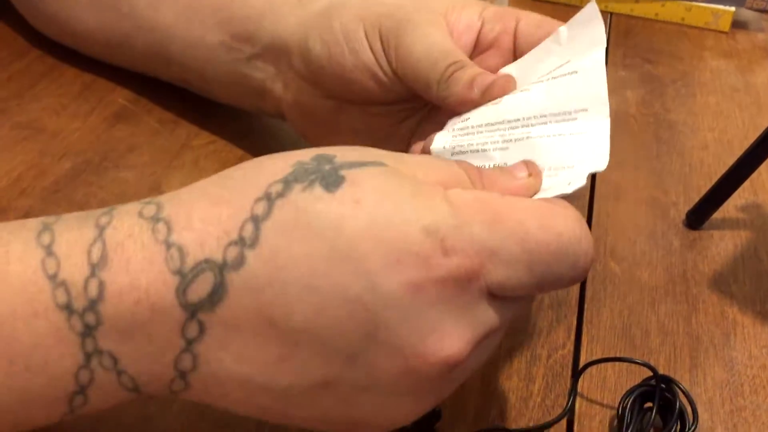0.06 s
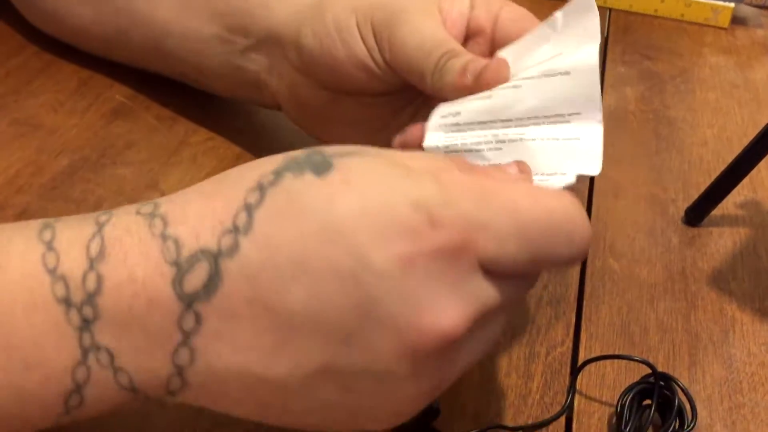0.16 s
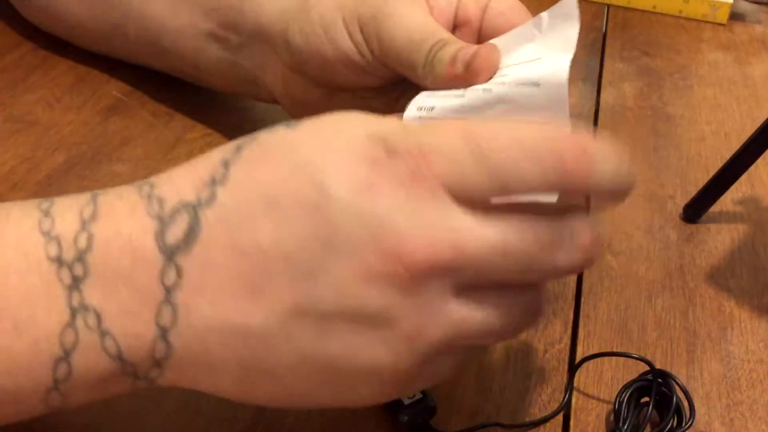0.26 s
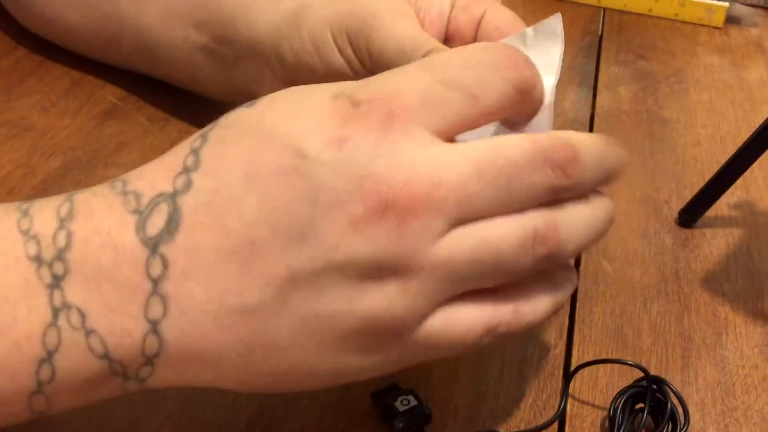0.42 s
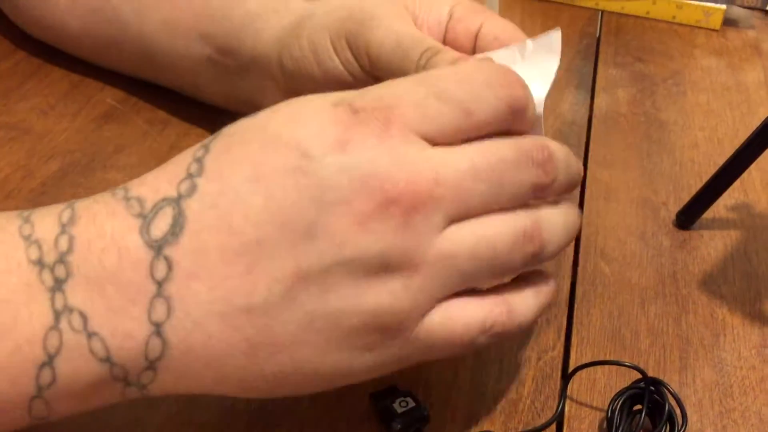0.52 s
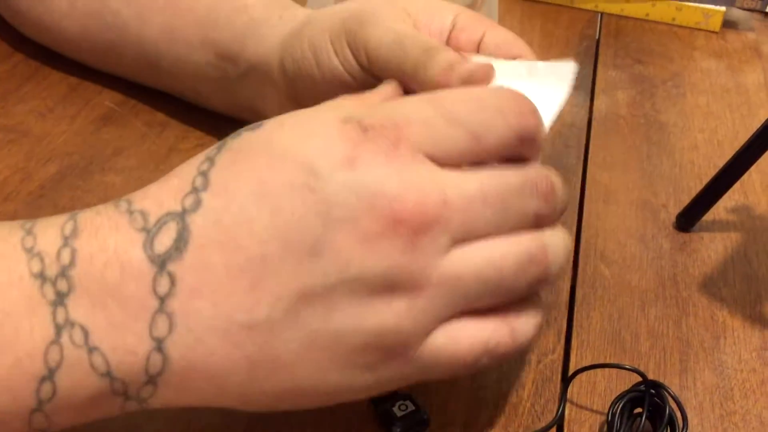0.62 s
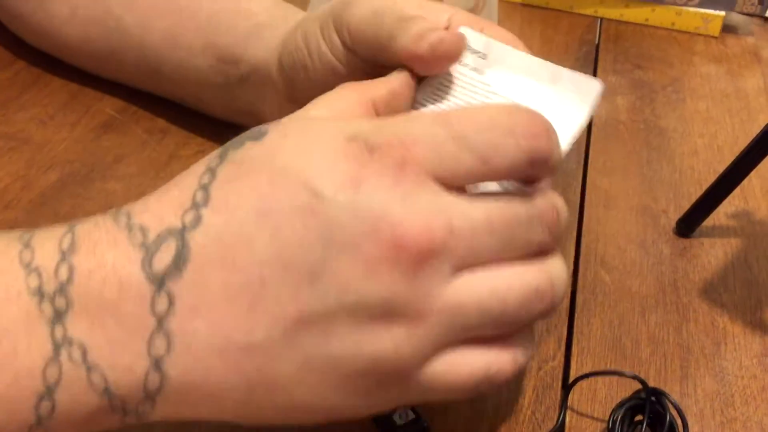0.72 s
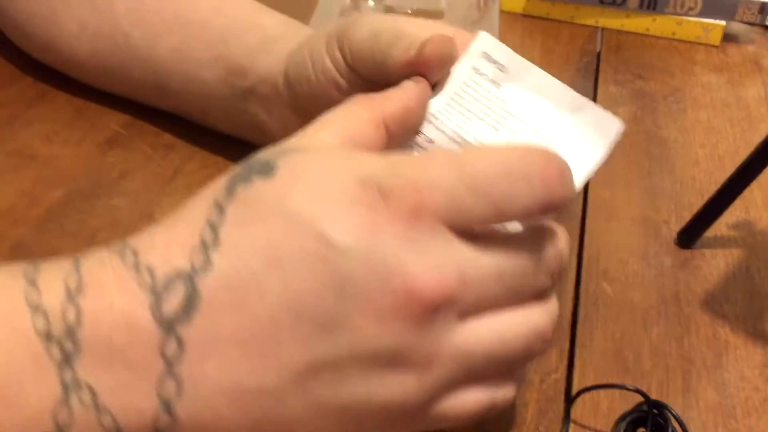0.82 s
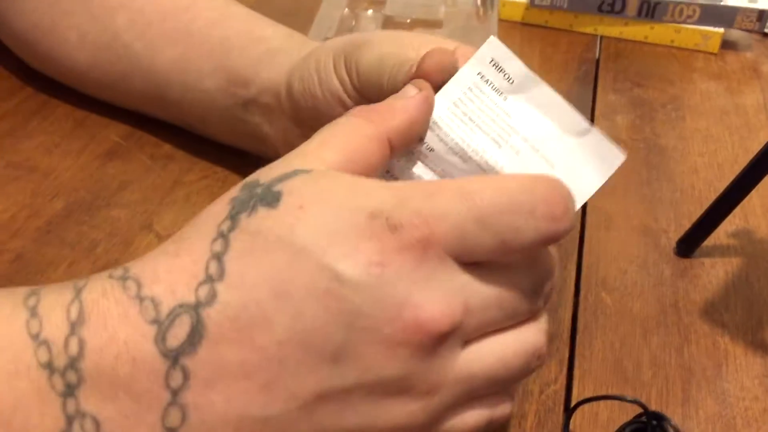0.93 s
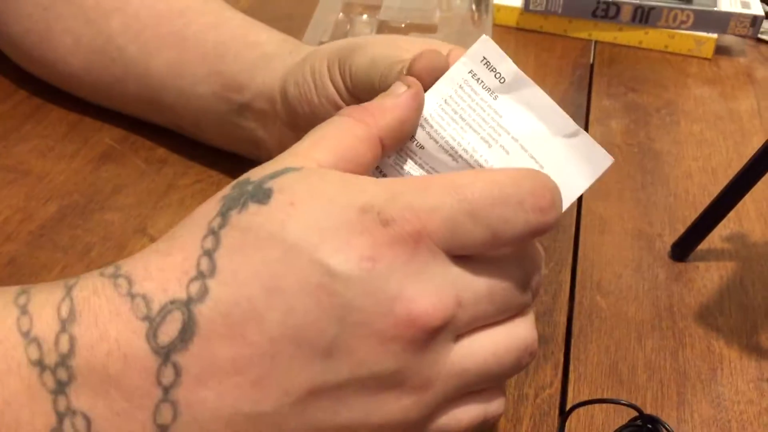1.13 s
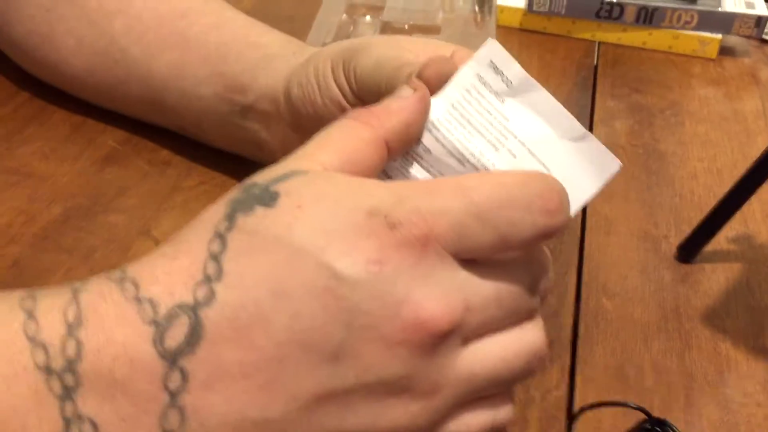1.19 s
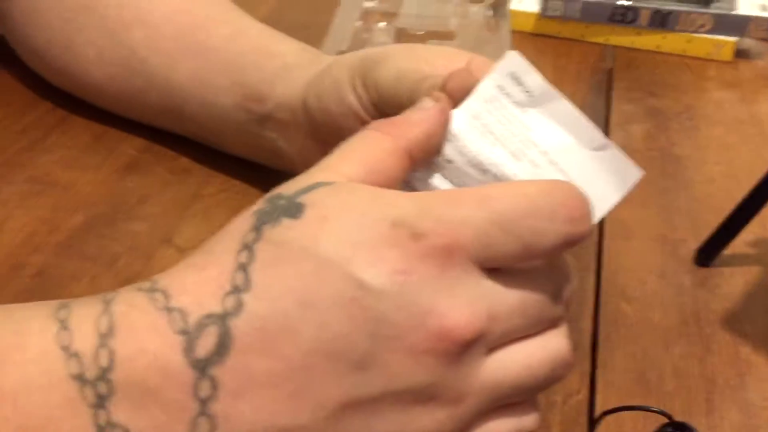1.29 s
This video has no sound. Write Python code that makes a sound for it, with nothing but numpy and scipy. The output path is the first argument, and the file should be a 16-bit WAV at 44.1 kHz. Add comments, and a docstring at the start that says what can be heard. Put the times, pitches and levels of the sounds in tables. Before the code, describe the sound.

Paper crinkling in sharp, irregular snaps with soft finger rustle, then a light knock on wood

```python
"""Creases of a small folded sheet of stiff paper snap over in short cracks as hands open it.
Each crack is a noise burst of milliseconds, coloured by its crease and by the sheet's rings.
Small patches crinkle as decaying tones; fingers slide on the sheet as a dense rain of tiny clicks.
A hand bumps the wooden table, whose modes ring; a quiet furnished room answers and rumbles faintly."""
import sys
import numpy as np
from scipy import signal
from scipy.fft import rfft, irfft
from scipy.io import wavfile
from scipy.ndimage import uniform_filter1d

SR = 44100
rng = np.random.default_rng(int(sys.argv[2]) if len(sys.argv) > 2 else 0)


def master_out(mix):
    """Clip the mix to full scale and print it as 16-bit PCM to the path in sys.argv[1]."""
    frames = np.transpose(np.atleast_2d(mix))
    ceiling = np.clip(frames, -1, 1)
    pcm = np.round(ceiling * 32767).astype(np.int16)
    wavfile.write(sys.argv[1], SR, pcm)


N = 59535


def amp(db):
    """Decibels to amplitude factor."""
    return 10 ** (np.asarray(db) / 20)


def rms_one(x):
    """Scales to rms 1."""
    return x / np.sqrt(np.mean(x ** 2) + 1e-20)


def at_hz(points, hz):
    """Reads a (frequency, value) table on a log frequency axis."""
    points = np.array(points)
    return np.interp(np.log(hz), np.log(points[:, 0]), points[:, 1])


def bump_at(hz, centre_hz, width_hz):
    """Bell of height 1 along frequency."""
    return np.exp(-2 * ((hz - centre_hz) / width_hz) ** 2)


# resonances of the held sheet, and dull regions of the near sounds such as one near 5 kHz: (frequency [Hz],
# width [Hz], gain [dB])
SHEET_MODES = [(647, 150, 0.5), (925, 320, 1.5), (1730, 160, 4), (2300, 300, 1.5), (3200, 350, 0.5),
               (4110, 440, -1), (4960, 430, -4.5), (5800, 1200, 0.5), (7100, 230, 2.5), (8900, 1000, 4),
               (10900, 900, 0)]


def sheet_db(hz):
    """Near sounds favour the held sheet's resonances and are dulled in a few regions."""
    return sum(db * bump_at(hz, mode_hz, width_hz) for mode_hz, width_hz, db in SHEET_MODES)


# crease snaps: (time [s], level [dB], six band levels at SNAP_BAND_HZ [dB per octave], rise [ms],
# decay [ms], main ring [Hz], its lift [dB], second ring [Hz], its lift [dB])
CREASE_SNAPS = [(0.0912, -51, -40, -9, -50, -7.5, -9, -3, 0.7, 2.7, 1000, 3.4, 3300, 3.6),
                (0.1131, -43, -49, -14, -25, -17, -14.5, -10.5, 0.4, 2.4, 1170, 5, 1500, 4.4),
                (0.157, -54.5, -10, 1, -28, 1, -13, 6.5, 0.43, 1.3, 1020, 4, 3900, 3),
                (0.2290, -22, -23.5, -2.5, -4.5, -3, 1.5, -5, 0.81, 0.8, 1050, 2.5, 4100, 5.5),
                (0.2798, -38, -39, -3.5, -5.5, -10, -9, 0.5, 0.84, 2.3, 4300, 6.2, 1860, 0.1),
                (0.2911, -31, -16.5, -8.5, -5, -5.5, 0.5, -7, 0.53, 2.15, 4200, 5.7, 614, 4.7),
                (0.414, -44.5, -11.5, -11.5, -6.5, -2, -6, -3.5, 1.5, 3.1, 3170, 3.6, 1380, 5.7),
                (0.4589, -43, -16, -11, -9, -5, -6, -6.5, 0.79, 2.2, 1240, 10.2, 4300, 1.5),
                (0.509, -49.5, -5, 0, -13, 0, -4, -7.5, 0.54, 2.1, 2290, 4.4, 700, 2),
                (0.5172, -24.5, -15.5, -7, -10, -1, -11, -14.5, 0.36, 1.5, 678, 8, 3670, 1.74),
                (0.549, -25.5, -26.5, -15, -18.5, -27, -13.5, -27, .4, 2, 1090, 3, 3696, 8.2),
                (0.5554, -49.5, -4, -0.5, -3.5, 10.5, 6, 1.5, 0.36, 1.4, 1700, 5.2, 900, 1.7),
                (0.5983, -44, -7.5, 3, -1.5, -3, 2.5, -15.5, 0.31, 1.5, 944, 9.5, 2540, 4.8),
                (0.689, -50, -10, -13, -7, -4, -11, -8, 1.1, 3.2, 1600, 6.4, 895, 3.4),
                (0.6958, -32.5, -20.5, -17, -4, -10.5, -4.5, 2, 2, 0.88, 1600, 4.5, 600, 6.5),
                (0.7838, -34.5, -31, -6.5, -3.5, -5, -8.5, -19, 0.59, 1.58, 1490, 4.6, 4300, 1)]
# bands of the crease colour: (frequency [Hz])
SNAP_BAND_HZ = [650, 1000, 1870, 3350, 6000, 11300]
SNAP_BASS_DB_PER_OCT = 14  # fall below the lowest band
SNAP_TOP_DB = -8.5  # change from the highest band to 16 kHz
RING_WIDTH_SHARE = 0.18  # of the ring frequency


def snap_colour_db(hz, band_db, ring_hz, ring_db, second_hz, second_db):
    """Target spectrum of one snap: crease bands, sheet modes and two rings of its own."""
    points = [*zip(SNAP_BAND_HZ, band_db), (16000, band_db[-1] + SNAP_TOP_DB)]
    colour_db = at_hz(points, hz) - 10 * np.log10(hz / 1000)  # per octave to per Hz
    colour_db = colour_db + sheet_db(hz)
    colour_db += ring_db * bump_at(hz, ring_hz, RING_WIDTH_SHARE * ring_hz)
    colour_db += second_db * bump_at(hz, second_hz, RING_WIDTH_SHARE * second_hz)
    return colour_db - SNAP_BASS_DB_PER_OCT * np.maximum(np.log2(SNAP_BAND_HZ[0] / hz), 0)


def causal_response(gain_db, size):
    """Minimum-phase response with the given gain, by folding the cepstrum."""
    cepstrum = irfft(gain_db * np.log(10) / 20)
    cepstrum[1:size // 2] *= 2
    cepstrum[size // 2 + 1:] = 0
    return np.exp(rfft(cepstrum))


def snaps():
    """Each crease gives way in a burst of milliseconds, coloured by crease and sheet."""
    size = 2048
    out = np.zeros(N + size)
    ms = np.arange(size) / SR * 1000
    hz = np.maximum(np.fft.rfftfreq(size, 1 / SR), 20)
    for start_s, level_db, *band_db, rise_ms, decay_ms, ring_hz, ring_db, second_hz, second_db in CREASE_SNAPS:
        rise = (1 - np.exp(-ms / max(rise_ms, 0.1))) ** 2
        decay = np.exp(-ms / max(decay_ms, 0.2))
        burst = rfft(rng.standard_normal(size) * rise * decay)
        own_db = 10 * np.log10(uniform_filter1d(np.abs(burst) ** 2, size=15))
        want_db = snap_colour_db(hz, band_db, ring_hz, ring_db, second_hz, second_db)
        crack = irfft(burst * causal_response(want_db - own_db, size))
        start = int(start_s * SR)
        out[start:start + size] += amp(level_db) * SR / 250 * crack
    return out[:N]


# soft crinkles under the fingers: (time [s], level [dB], frequency [Hz])
SOFT_CRINKLES = [(.967, -56, 624), (.970, -43.5, 1390), (1.047, -51.5, 957), (1.053, -48.5, 1450)]
CRINKLE_PEAK_CYCLES = 2.2  # cycles from onset to envelope peak


def crinkles():
    """A small patch of the sheet buckles softly and rings for a few cycles."""
    t = np.arange(N) / SR
    out = np.zeros(N)
    for start_s, level_db, hz in SOFT_CRINKLES:
        cycles = np.maximum(t - start_s, 0) * hz
        x = cycles / CRINKLE_PEAK_CYCLES
        out += amp(level_db) * np.e * x * np.exp(-x) * np.sin(2 * np.pi * cycles)
    return out


def coloured(x, spectrum, sheet_share=0):
    """Shapes steady noise to a spectrum table plus a share of the sheet's modes; rms 1."""
    hz = np.maximum(np.fft.rfftfreq(len(x), 1 / SR), 10)
    low_hz, high_hz = spectrum[0][0], spectrum[-1][0]
    octaves_outside = np.maximum(np.log2(low_hz / hz), 0) + np.maximum(np.log2(hz / high_hz), 0)
    gain_db = at_hz(spectrum, hz) - 30 * octaves_outside + sheet_share * sheet_db(hz)
    return rms_one(irfft(rfft(x) * amp(gain_db), len(x)))


# finger strokes: (start [s], loudest [s], end [s], treble level [dB], middle level [dB],
# top octave level [dB])
FINGER_STROKES = [(-.05, 0.061, 0.071, -52, -65, -61), (0.027, 0.103, 0.17, -53, -77, -64),
                  (0.104, 0.167, 0.3, -47.5, -56, -60), (0.383, 0.417, 0.58, -54, -55, -64),
                  (0.665, 0.676, 0.81, -52, -55, -67), (0.89, 0.972, 0.981, -54.5, -51.5, -55),
                  (1.028, 1.062, 1.103, -58, -51.5, -68)]
# slide spectra, treble, middle and top octave: (frequency [Hz], density [dB per Hz])
TREBLE_SPECTRUM = [(2500, -12.5), (4000, 3), (5200, -1.5), (7200, 1.5), (9000, -2), (12000, 0.5),
                   (15500, -8), (16500, -14.5)]
MIDDLE_SPECTRUM = [(500, -8.5), (900, 3), (1500, 3), (2400, 2.5), (3600, -1.5), (5500, -11.5)]
AIR_SPECTRUM = [(8000, 0), (16000, -2.5)]
FIBRES_PER_S, FIBRE_SPREAD_DB = 12000, 2.5
STROKE_FADE_DB = 24  # loss at the start and end of a stroke


def stroke_swell(t, column):
    """Adds the power of all strokes in one level column; returns amplitude."""
    power = 0
    for row in FINGER_STROKES:
        start_s, loudest_s, end_s = row[:3]
        times_s = [start_s - 0.02, start_s, loudest_s, end_s, end_s + 0.02]
        distance = np.interp(t, times_s, [3, 1, 0, 1, 3])
        power = power + amp(row[column] - STROKE_FADE_DB * distance ** 2) ** 2
    return np.sqrt(power)


def slide():
    """Skin catches on the fibres: a dense rain of uneven clicks swells with each stroke."""
    t = np.arange(N) / SR
    out = 0
    for column, spectrum in ((3, TREBLE_SPECTRUM), (4, MIDDLE_SPECTRUM), (5, AIR_SPECTRUM)):
        hits = rng.random(N) < FIBRES_PER_S / SR
        spread = amp(FIBRE_SPREAD_DB * np.minimum(rng.exponential(1, N), 2))
        grains = hits * rng.standard_normal(N) * spread
        out = out + stroke_swell(t, column) * coloured(grains, spectrum, sheet_share=1.0)
    return out


# hand bumps: (time [s], level [dB], gain of modes under 200 Hz [dB],
# gain of modes at 400-600 Hz [dB], contact [ms])
HAND_BUMPS = [(0.124, -60, 4, -11, 1.2), (0.1484, -45, -5, 27, 1.7), (0.436, -53.5, 7.5, 7, 1.7),
              (0.477, -49.5, -6, -6.5, 0.53), (1.21, -56, 6.5, -9.5, 3.3), (1.2331, -35.5, -6.5, 6.5, 0.64),
              (1.255, -48, 2, 9, 0.21), (1.282, -62.5, 5.5, 21, 0.48)]
# table top modes: (frequency [Hz], level [dB], T60 [s])
TABLE_MODES = [(140.6, 9, 0.071), (200, 3, 0.067), (337, 5.5, 0.038), (460, -4, 0.024), (806, -3, 0.05),
               (1007, -12, .07), (1550, -12.5, 0.075), (2200, -13.5, 0.11), (3900, -11, 0.067)]


def bumps():
    """A soft contact rings the table top's modes; where the hand lands decides which."""
    out = np.zeros(N + SR)
    t = np.arange(SR // 4) / SR
    for start_s, level_db, low_db, knock_db, contact_ms in HAND_BUMPS:
        ring = 0
        for hz, mode_db, t60_s in TABLE_MODES:
            place_db = low_db * (hz < 200) + knock_db * (400 < hz < 600)
            softness_db = -3 * (hz * contact_ms / 1000) ** 2  # long contacts dull high modes
            gain_db = level_db + mode_db + place_db + softness_db - 60 * t / t60_s
            ring = ring + amp(gain_db) * np.sin(2 * np.pi * hz * t)
        onset = (1 - np.exp(-t * 1000 / max(contact_ms, 0.1))) ** 2
        start = int(start_s * SR)
        out[start:start + len(t)] -= ring * onset
    return out[:N]


def band(x, low_hz, high_hz):
    """Band-pass."""
    return signal.sosfilt(signal.butter(2, [low_hz, high_hz], "band", fs=SR, output="sos"), x)


def wander(size, span_s):
    """Slow chance that holds for about span_s; rms 1."""
    span = max(int(span_s * SR), 2)
    smooth = uniform_filter1d(rng.standard_normal(size), span)
    return rms_one(uniform_filter1d(smooth, span))


# reverberation time: (frequency [Hz], T60 [s])
REVERB_T60 = [(400, 0.26), (1000, 0.28), (2500, 0.22), (6000, 0.3), (12000, 0.31)]
# tail colour: (frequency [Hz], level [dB])
REVERB_COLOUR = [(400, 2), (1000, 1.5), (2500, 4), (6000, -3), (12000, -3.5)]
# single wall reflections: (delay [s], level [dB])
WALL_ECHOES = [(.0097, -19.5), (0.0115, -18), (0.027, -25.5)]
ROOM_DB, FIRST_WALL_S, EARLY_DB = -9.5, 0.0066, -7  # EARLY_DB applies before FIRST_WALL_S
TAIL_LUMP_DB, TAIL_LUMP_S = 1.5, 0.002  # the tail arrives in uneven clumps


def room(x):
    """Little returns until the nearest walls answer; then a dense tail dies band by band."""
    t = np.arange(SR // 2) / SR
    edges_hz = 200 * 2 ** np.arange(0, 6.6, 0.5)
    white = rng.standard_normal((2, len(t)))
    tail = 0
    for k, (low_hz, high_hz) in enumerate(zip(edges_hz, edges_hz[1:])):
        mid_hz = np.sqrt(low_hz * high_hz)
        decay_db = at_hz(REVERB_COLOUR, mid_hz) - 60 * t / at_hz(REVERB_T60, mid_hz)
        tail = tail + amp(decay_db) * band(white[k % 2], low_hz, high_hz)
    early_db = np.where(t < FIRST_WALL_S, EARLY_DB, 0)
    lump_db = TAIL_LUMP_DB * wander(len(t), TAIL_LUMP_S)
    tail = tail * amp(early_db + lump_db) * np.minimum(t / 0.002, 1)
    tail = amp(ROOM_DB) * tail / np.sqrt(np.sum(tail ** 2))
    for delay_s, level_db in WALL_ECHOES:
        tail[int(delay_s * SR)] += amp(level_db)
    return signal.fftconvolve(x, tail)[:N]


# room rumble: (frequency [Hz], density [dB per Hz])
RUMBLE_SPECTRUM = [(40, -6), (70, 4), (100, -8.5), (134, 0.5), (170, -10.5), (240, -7), (400, -16.5),
                   (600, -22.5), (1200, -20), (3500, -23), (6000, -31.5), (15500, -39.5)]
RUMBLE_DB = -58.5  # rms


def rumble():
    """Steady noise, strongest in the bass."""
    return amp(RUMBLE_DB) * coloured(rng.standard_normal(N), RUMBLE_SPECTRUM)


def scene():
    """Sums paper, fingers and table, the room's answer to them, and the rumble."""
    near = snaps() + crinkles() + slide() + bumps()
    return (near + room(near) + rumble())[None]


MIC_LOW_HZ, STOP_HZ = 54, 16700  # STOP_HZ: 60 dB down
PEAK_LIMIT = 0.92


def record(dry):
    """The microphone drops the deepest bass, peaks are rounded, the top is cut."""
    dry = signal.sosfilt(signal.butter(2, MIC_LOW_HZ, "high", fs=SR, output="sos"), dry)
    rounded = dry / (1 + np.abs(dry / PEAK_LIMIT) ** 10) ** 0.1
    return signal.sosfilt(signal.cheby2(12, 60, STOP_HZ, fs=SR, output="sos"), rounded)


dry = scene()
out = record(dry)
master_out(out)
```